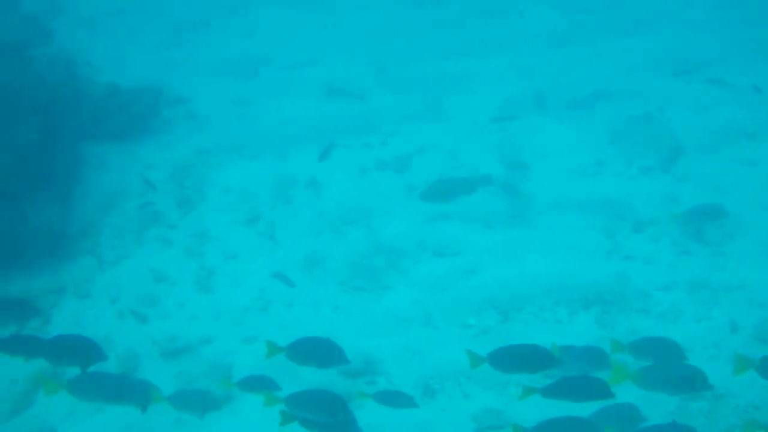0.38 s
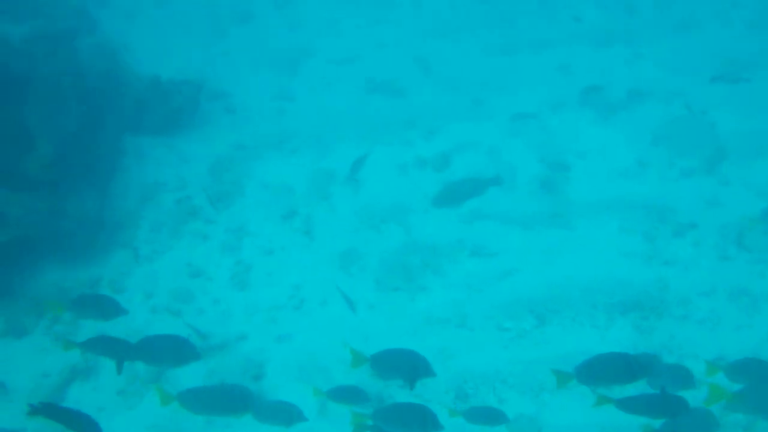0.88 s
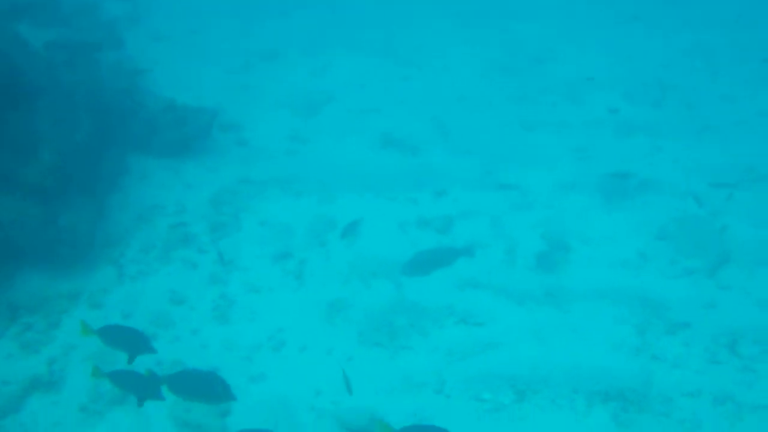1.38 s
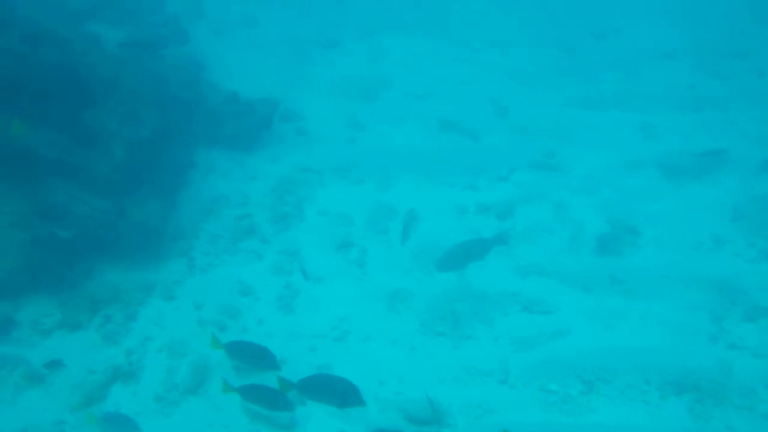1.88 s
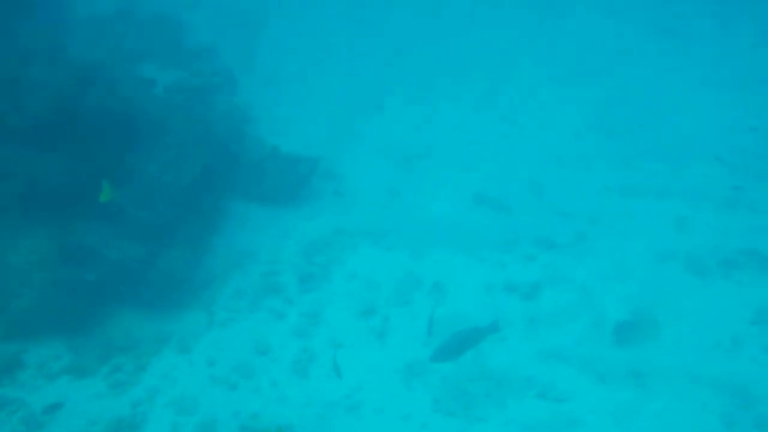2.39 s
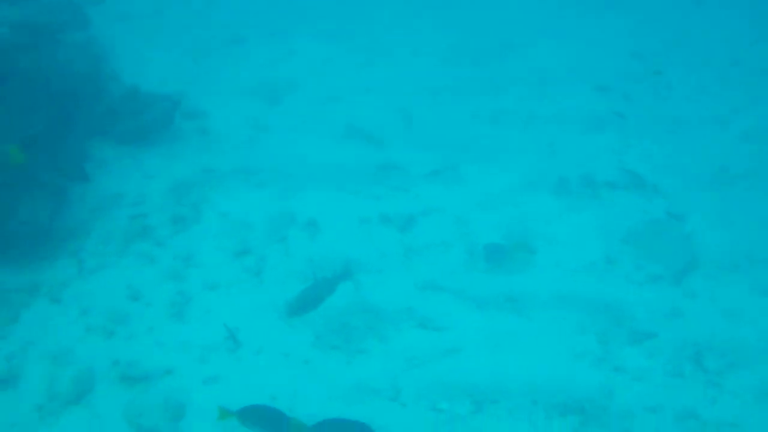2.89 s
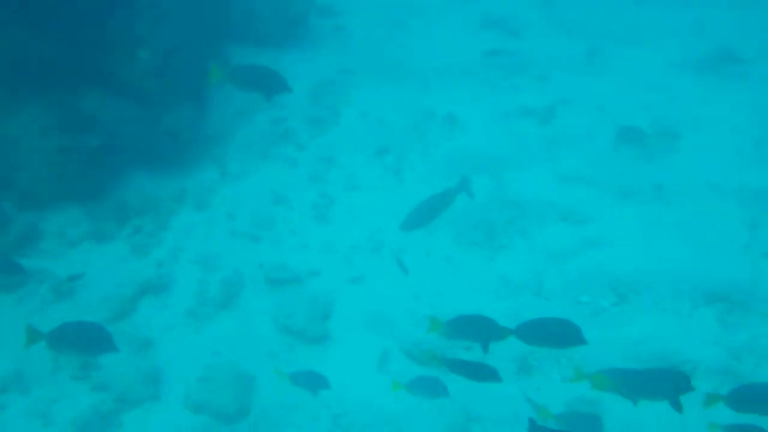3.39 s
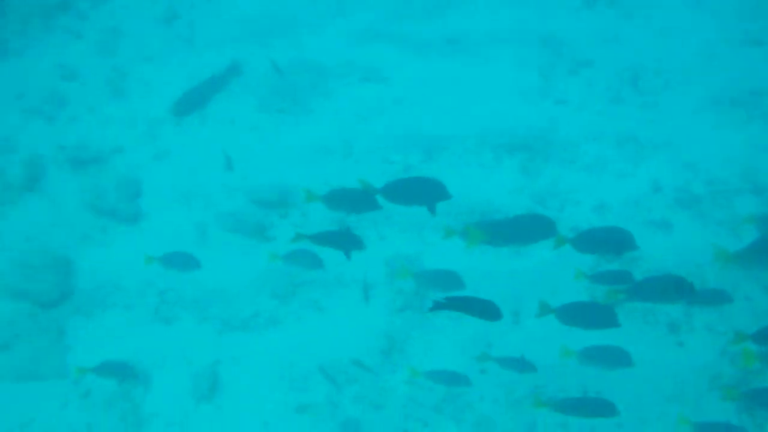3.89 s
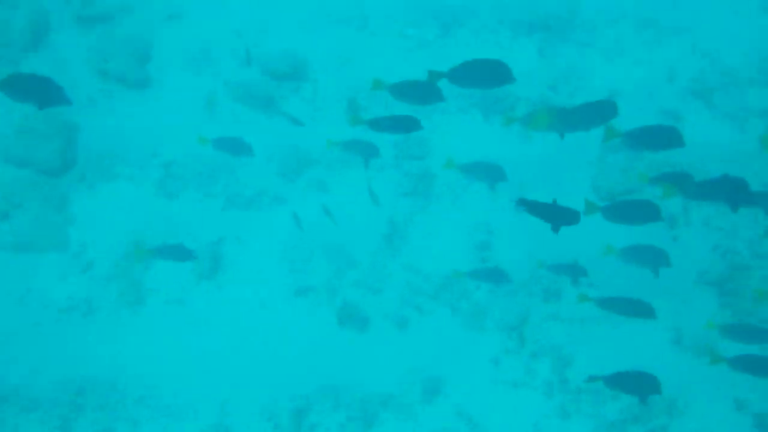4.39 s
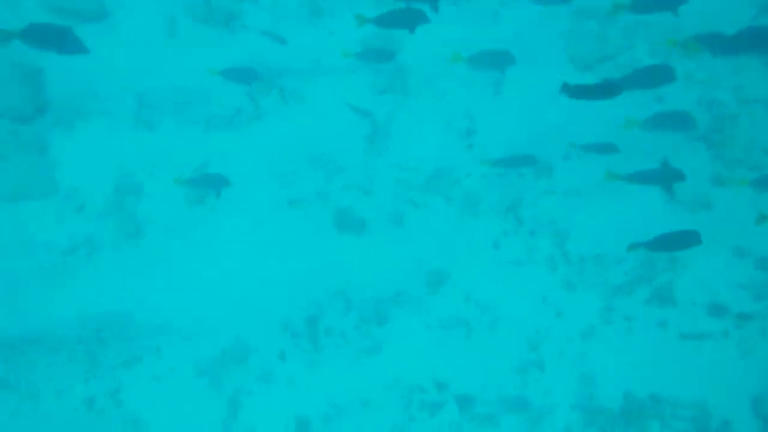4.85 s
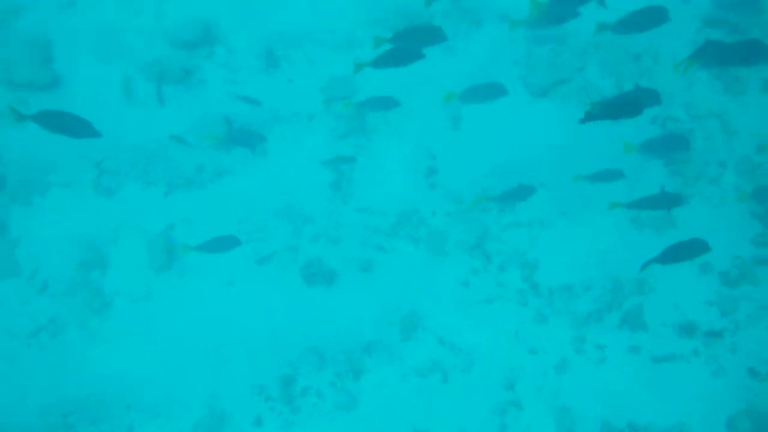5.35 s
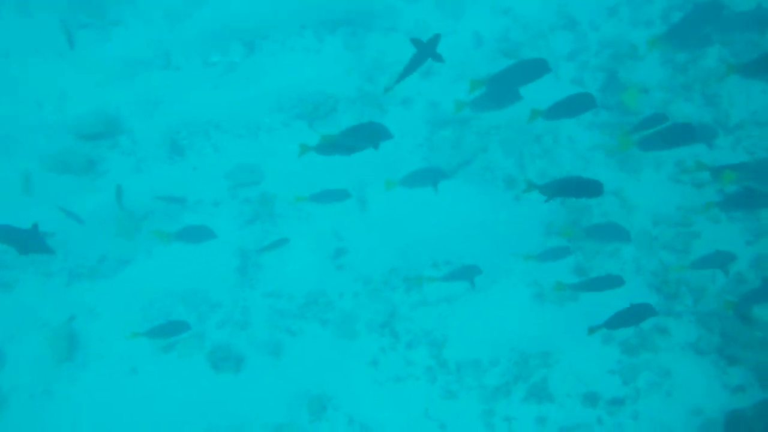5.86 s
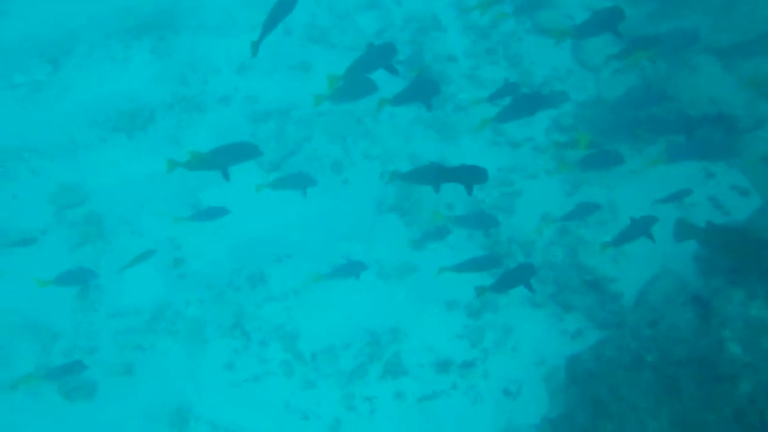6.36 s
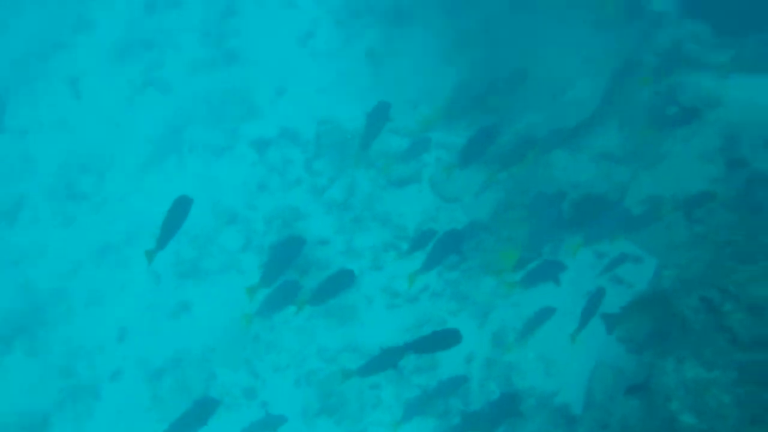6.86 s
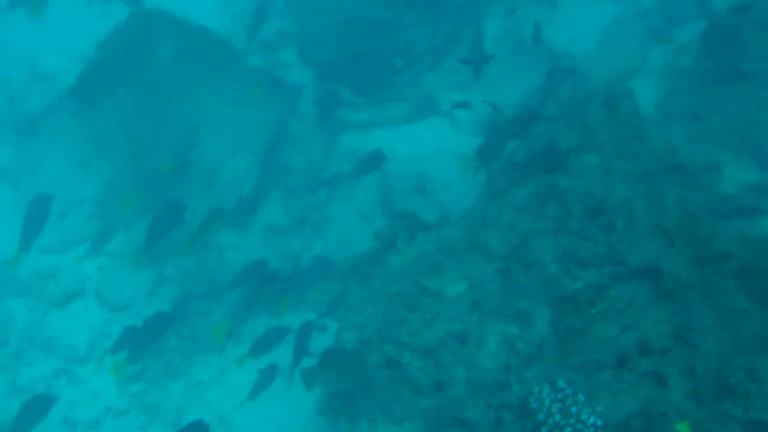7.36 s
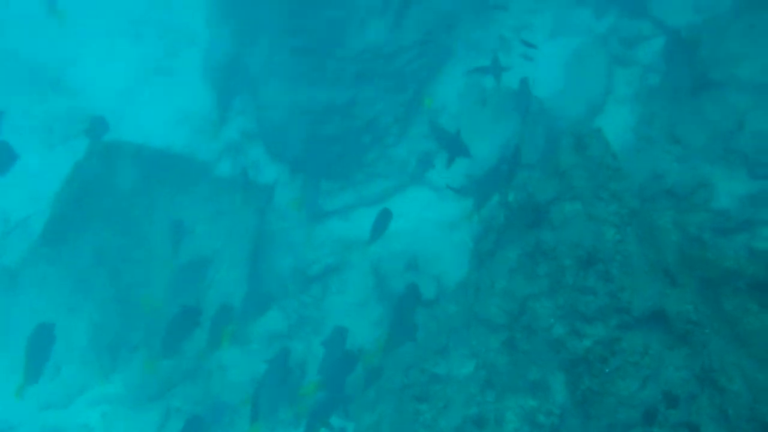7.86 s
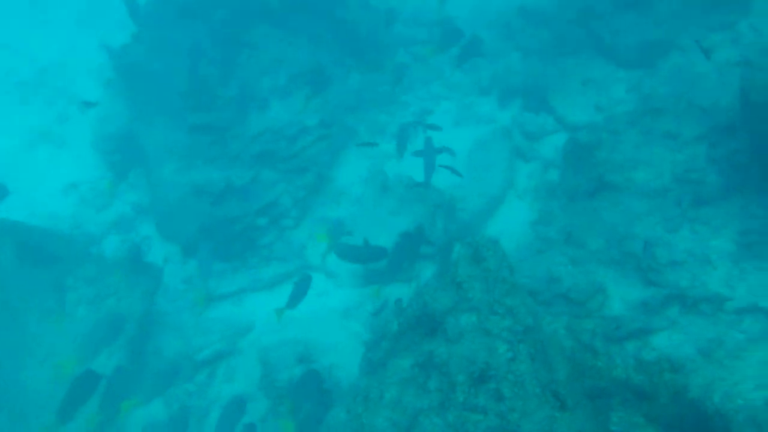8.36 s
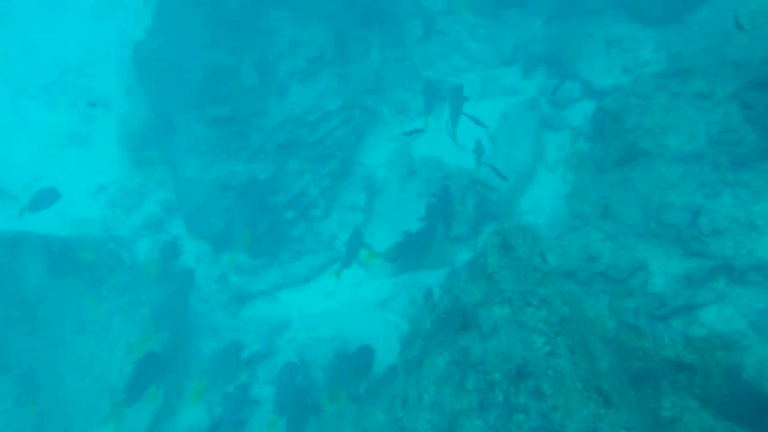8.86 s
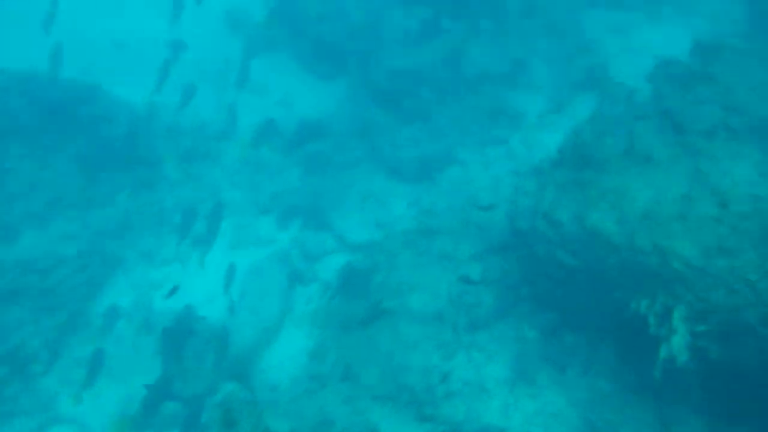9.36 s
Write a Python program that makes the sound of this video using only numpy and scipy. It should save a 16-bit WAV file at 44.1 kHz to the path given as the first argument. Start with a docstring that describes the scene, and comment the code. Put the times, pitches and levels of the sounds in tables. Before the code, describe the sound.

Muffled, close underwater sound from a camera sealed in a case. From 0 s a low rumble and hollow air-pocket boom waver beneath a fine, distant shrimp crackle, with many dry snaps, bubble blips and small water slaps. A dull thump lands near 1.6 s; bubbles cluster around 2.2 s, and a hard knock at 2.4 s makes the whole sound dip and slowly recover. More booming and knocks come at 3 to 4 s, with a strong one at 4.0 s. Thumps return near 5.1 and 5.4 s, and a sharp snap at 5.6 s. From 6.2 to 7 s the case heaves heavily, with deep surges, gurgling bubbles and the biggest thump at 7.0 s. Around 8 s the reef is sparse and quieter. Snaps pick up from 8.7 s, a cluster of clicks and a thump hit near 9.4 s, and rushing water and crackle swell to the end.

```python
"""A camera in a sealed housing drifts over a reef. From the start, shaped noise makes the rumble of water
pushing past the case, the boom of its air pocket and the wash of far shrimp. Short dying tones make bubbles,
then snaps, slaps of water, high ticks and, from 1.6 s, dull thumps. Between 6 and 7 s the case heaves and
thumps hardest; near 8 s the reef grows quiet, and water and crackle swell again toward the end.
Loud knocks make the camera's gain control duck; it creeps back after each."""
import sys
import numpy as np
from scipy import signal
from scipy.io import wavfile
from scipy.ndimage import uniform_filter1d

SR = 44100
rng = np.random.default_rng(int(sys.argv[2]) if len(sys.argv) > 2 else 0)


def boost_factor(decibels):
    """Convert a level in decibels to a linear amplitude factor."""
    exponent = np.asarray(decibels, float) / 20
    return 10 ** exponent


def log_audio(samples):
    """Write samples as a 16-bit WAV file to the path given in sys.argv[1]."""
    # one column per channel
    frames = np.atleast_2d(samples).T
    # limit to full scale, then quantise
    limited = np.clip(frames, -1, 1)
    pcm = np.round(limited * 32767).astype(np.int16)
    wavfile.write(sys.argv[1], SR, pcm)


N = 429534  # length in samples
# All levels in the tables are those before the gain control.


def evened(x):
    """Scales a sound to rms 1."""
    return x / np.sqrt(np.mean(x ** 2) + 1e-20)


def curve(table, axis=1):
    """Reads one column of a table of times at every sample."""
    table = np.array(table)
    return np.interp(np.arange(N) / SR, table[:, 0], table[:, axis])


def read(points, hz):
    """Reads a spectrum on a log-frequency axis."""
    f, value = np.transpose(points)
    return np.interp(np.log(hz + 1), np.log(f + 1), value)


def causal(points, size=2048):
    """Shortest impulse response with the given spectrum (minimum phase)."""
    gain = boost_factor(read(points, abs(np.fft.fftfreq(2 * size, 1 / SR))))
    spectrum = np.exp(np.conj(signal.hilbert(np.log(gain))))
    return np.fft.ifft(spectrum).real[:size]


def add(mix, s, sound):
    """Mixes a sound in at s seconds."""
    part = mix[round(s * SR):][:len(sound)]
    part += sound[:len(part)]


def resonate(x, hz, width):
    """Rings at the moving pitch hz: shifts it down to zero, smooths, and shifts back."""
    turn = np.exp(2j * np.pi * np.cumsum(hz) / SR)
    r = np.exp(-np.pi * width / SR)
    return 2 * (turn * signal.lfilter([1 - r], [1, -r], x / turn)).real


def lumpy(lump_db, lump_s):
    """White noise whose level wanders in lumps, as turbulent water does."""
    # The level is drawn once per 64 samples and smoothed by a bell curve.
    bell = np.exp(-(np.arange(-60, 61) * 64 / SR / lump_s) ** 2)
    lumps = evened(np.convolve(rng.standard_normal(N // 64 + 1), bell, "same"))
    level_db = lump_db * np.interp(np.arange(N) / 64, np.arange(len(lumps)), lumps)
    return evened(rng.standard_normal(N) * boost_factor(level_db))


def ring(hz, t60, rise_s, glide, size=3500):
    """A dying tone of peak 1 whose pitch slides by the share glide in every half t60 (s to fall 60 dB)."""
    t = np.arange(size) / SR
    swing = np.sin(2 * np.pi * hz * t * (1 + glide * t / t60))
    tone = swing * (1 - np.exp(-t / rise_s)) * boost_factor(-60 * t / t60)
    return tone / abs(tone).max()


def scattered(sound, echo_db, echo_s):
    """Adds the quick blur of echoes from rock, sand and surface."""
    echoes = boost_factor(echo_db) * rng.standard_normal(900) * np.exp(-np.arange(900) / SR / echo_s)
    return signal.convolve(sound, np.append(1, echoes))


def grains(templates, per_s, spread_db, clump_db):
    """Scatters the templates at random moments, in clumps; most are small, a few large."""
    # Each stretch of 900 samples has its own crowding.
    crowding = np.repeat(rng.standard_normal(N // 900 + 1), 900)[:N]
    clumps = boost_factor(clump_db * evened(crowding))
    size = boost_factor(spread_db * np.minimum(rng.exponential(1, N), 3.5))
    size = size * (rng.random(N) < clumps * per_s / SR)
    kind = rng.integers(0, len(templates), N)
    return evened(sum(signal.oaconvolve(size * (kind == k), g)[:N] for k, g in enumerate(templates)))


def hiss():
    """Self-noise of the microphone: steady white noise."""
    return boost_factor(-54.0) * rng.standard_normal(N)


# water pushing past the case: start_s, rumble_db, pocket_boom_db
WATER_FLOW = [(0.0, -30, -22.5), (0.3, -29.5, -23.5), (0.65, -36, -30), (1.0, -33.5, -22), (1.4, -29, -29),
              (1.58, -23, -20.5), (1.9, -27.5, -30.5), (2.3, -27, -19), (2.75, -27, -25),
              (2.92, -24.5, -9.5), (3.15, -26, -18.5), (3.55, -22, -9.5), (3.9, -28, -20.5),
              (4.2, -19.5, -17), (4.6, -17.5, -17.5), (5.0, -26.5, -24), (5.27, -30.5, -29.5),
              (5.42, -19, -15.5), (5.75, -22, -14), (6.05, -19.5, -12.5), (6.16, -11.5, -11),
              (6.33, -3.5, -5.5), (6.44, -5, -8), (6.5, -15, -10), (6.8, -12.5, -11), (7.0, -7, -9),
              (7.2, -17, -9), (7.75, -25, -26), (7.95, -21, -16.5), (8.5, -24, -16), (9.03, -16.5, -10.5),
              (9.17, -24.5, -23), (9.5, -9, -9.5), (9.74, -9, -6)]
# level of the deep heave: start_s, level_db
HEAVE_LEVEL = [(0.0, -40.5), (1.2, -47.5), (1.8, -56), (3.1, -36), (3.9, -33.5), (4.17, -18.5), (4.6, -31),
               (5.2, -38), (5.95, -41), (6.15, -22), (6.3, -3), (6.44, -9.5), (6.55, -27), (7.1, -27),
               (7.7, -42), (8.9, -36.5), (9.4, -22), (9.74, -28)]
# spectrum of the eddies on the case wall: pitch_hz, level_db (per Hz)
EDDY_SPECTRUM = [(60, -9.5), (110, -3.5), (200, 1.5), (320, 5), (450, -13.5), (560, -19.5), (1200, -50.5),
                 (4000, -74)]
# spectrum of the surges that heave the case: pitch_hz, level_db (per Hz)
HEAVE_SPECTRUM = [(10, -39), (30, -6), (55, -5.5), (85, 2), (150, -1), (320, -33), (2000, -80)]


def rumble():
    """Eddies thud on the case wall, and larger surges heave the whole case."""
    eddies = evened(signal.oaconvolve(lumpy(1.5, 0.06), causal(EDDY_SPECTRUM, size=4096))[:N])
    surges = evened(signal.oaconvolve(lumpy(3.7, 0.012), causal(HEAVE_SPECTRUM, size=8192))[:N])
    return boost_factor(curve(WATER_FLOW)) * eddies + boost_factor(curve(HEAVE_LEVEL)) * surges


# pitch of the air pocket as the camera tilts, and how far sloshing makes it waver:
# start_s, pitch_hz, waver_hz (rms)
POCKET_PITCH = [(0., 384, 11), (3.9, 380.6, 18.5), (5.15, 365, 41), (5.7, 313.5, 37), (6.3, 325, 69),
                (7.75, 288, 41), (8.1, 326.3, 37), (9.74, 332, 38)]


def pocket(top_hz=450.0):
    """Turbulence rings the trapped air; above its pitch the stiff wall passes little."""
    slosh = uniform_filter1d(rng.standard_normal(N), size=220)
    slosh = evened(uniform_filter1d(slosh, size=220))
    hz = curve(POCKET_PITCH) + curve(POCKET_PITCH, axis=2) * slosh
    once = resonate(lumpy(1.2, 0.012), hz, 93.0)
    twice = resonate(once, hz, 59.0)
    boom = signal.lfilter(*signal.butter(5, top_hz, fs=SR), twice)
    return boost_factor(curve(WATER_FLOW, axis=2)) * evened(boom)


# busy and quiet spells: start_s, reef_crackle_db (before the case), small_bubbles_db
BUSY_SPELLS = [(0.0, -40.5, -35.5), (0.3, -40.5, -33.5), (0.7, -44, -36), (1.05, -39, -32),
               (1.35, -47.5, -35), (1.6, -39.5, -31), (1.92, -44.5, -31), (2.2, -39, -33.5),
               (2.8, -39.5, -30), (3.15, -37.5, -25.5), (3.7, -39.5, -33.5), (4.2, -38.5, -30.5),
               (4.95, -41, -34.5), (5.2, -46, -49.5), (5.6, -39, -31), (6.22, -40.5, -32.5),
               (6.53, -32, -29), (6.85, -37.5, -24), (7.15, -41.5, -32.5), (8.0, -50, -39.5),
               (8.55, -43.5, -36.5), (9.03, -36.5, -33.5), (9.25, -44.5, -34), (9.42, -32.5, -25),
               (9.55, -34.5, -23), (9.74, -34.5, -21)]
# finest sounds of the reef, before the case: start_s, fizz_db, wash_treble_db
FINE_REEF = [(0.0, -33.5, -35), (1.0, -33, -42), (2.0, -35.5, -40), (3.0, -28.5, -35), (4.0, -33, -35.5),
             (5.0, -33.5, -38), (5.8, -34.5, -39), (6.5, -30.5, -32.5), (7.2, -35.5, -38), (7.8, -37, -39),
             (8.3, -34.5, -45), (8.9, -33, -36), (9.3, -35.5, -31.5), (9.74, -28.5, -27)]
# how the case passes sound from the water to the microphone: pitch_hz, gain_db (relative)
CASE_PASSAGE = [(400, -32.5), (950, -7.5), (1250, -10), (1600, 1.5), (2200, 0), (2550, -3), (2850, 0),
                (3600, -10.5), (4250, -9.5), (4750, -10), (5400, -2.5), (6400, -15.5), (7500, -20.5),
                (8700, -16), (10600, -17), (11500, -21.5), (13000, -26), (14400, -33), (15500, -58)]


def reef(wash_db=-35.5, follow=0.52, far_hz=6700.0):
    """Countless far shrimp merge to a wash and a fine fizz; nearer ones crackle in spells."""
    draws = rng.random((2, 20, 2))
    fine = [ring(3000 + 12500 * a, (3.5 + 16.0 * b ** 2) / (3000 + 12500 * a), 0.00006, 0, size=300)
            for a, b in draws[0]]
    coarse = [ring(1200 + 3300 * a, (2.5 + 30.0 * b ** 3) / (1200 + 3300 * a), 0.0001, -0.22, size=1400)
              for a, b in draws[1]]
    spell_db = curve(BUSY_SPELLS)
    # The wash splits at far_hz; its lower part follows the spells by the share follow.
    wide = lumpy(1.5, 0.012)
    far = signal.lfilter(*signal.butter(3, far_hz, fs=SR), wide)
    treble = signal.lfilter(*signal.butter(3, far_hz, "high", fs=SR), wide)
    water = boost_factor(wash_db + follow * (spell_db - spell_db.mean())) * far
    water += boost_factor(curve(FINE_REEF, axis=2)) * treble
    fizz = grains([scattered(g, -23.0, 0.0032) for g in fine], 650.0, 5.76, 2.8)
    water += boost_factor(curve(FINE_REEF)) * fizz
    crackle = grains([scattered(g, -31.0, 0.009) for g in coarse], 420.0, 4.6, 3.5)
    water += boost_factor(spell_db) * crackle
    case = causal(CASE_PASSAGE)
    return signal.oaconvolve(water, case / np.linalg.norm(case))[:N]


# level of the larger, deeper bubbles: start_s, level_db
LARGE_BUBBLES = [(0.0, -44), (2.0, -46), (3.4, -36), (3.75, -24), (4.3, -31), (4.9, -38.5), (6.3, -53),
                 (6.8, -17), (7.1, -50), (9.74, -42)]
# clearest bubbles slipping around the case:
# start_s, peak_db (before echoes), start_pitch_hz, t60_s, slide (share of the pitch per half t60)
CLEAR_BUBBLES = [(0.405, -19, 1000, 0.036, 0.024), (0.571, -12.5, 1026, 0.035, -0.027),
                 (1.097, -16.5, 2210, 0.016, -0.048), (1.803, -31.5, 1050, 0.39, -0.066),
                 (2.162, -18, 1310, 0.033, -0.25), (2.208, -17, 1430, 0.079, 0.085),
                 (2.229, -14.5, 797, 0.084, -0.046), (2.227, -24, 1060, 0.059, .05),
                 (2.229, -21, 1806, 0.031, 0.045), (2.283, -28, 1560, 0.08, -.02),
                 (2.289, -15, 1033, 0.072, -0.094), (3.841, -17, 1600, 0.049, -0.058),
                 (4.665, -17, 836, 0.067, 0.095), (4.76, -18, 896, 0.066, 0.064),
                 (5.773, -19, 1530, 0.067, 0.031), (6.327, -18.5, 1275, 0.12, -0.27),
                 (6.435, -23, 805, 0.1, 0.55), (6.483, -20, 1300, 0.048, .1), (6.517, -11, 1430, 0.026, 0),
                 (6.557, -12, 1115, 0.12, -0.35), (6.59, -11, 1500, 0.04, 0.22),
                 (6.65, -20, 1560, 0.14, -0.081), (6.697, -12, 1340, 0.04, -0.027),
                 (6.72, -13, 2830, 0.034, -0.014), (6.75, -15, 1530, 0.087, -0.38),
                 (6.825, -12, 1700, 0.018, -0.0099), (6.857, -15, 1710, 0.03, 0.2),
                 (6.983, -18, 1320, 0.08, 0.048), (7.276, -15, 790, 0.022, -0.04),
                 (7.61, -25, 1150, 0.05, 0.072), (8.792, -19, 1950, 0.032, 0.14),
                 (8.903, -20.5, 1420, 0.09, -0.042), (8.93, -20, 1080, 0.05, -0.038),
                 (8.966, -22, 1220, 0.04, 0.19), (9.021, -17, 820, 0.067, -0.023)]
# tiny bubbles whose pitch drops fast: start_s, peak_db, start_pitch_hz
TINY_BUBBLES = [(2.004, -20, 4300), (2.01, -24, 3520), (2.018, -31, 2376), (2.038, -23, 4660),
                (2.101, -25, 4400), (2.124, -20.5, 2570), (6.401, -9, 3100), (6.554, -9, 4290),
                (6.614, -11, 2400), (6.69, -24, 3150), (8.468, -25, 1750), (8.514, -17, 1950),
                (8.829, -16, 2350), (8.929, -18, 1950), (8.863, -21, 2300)]


def bubbles():
    """Each bubble rings at its own pitch and slides as it deforms."""
    small = [ring(480 * 3.18 ** a, 0.0013 + 0.065 * b ** 2, 0.0033, 0.5 * (c - 0.5), size=4500)
             for a, b, c in rng.random((24, 3))]
    out = boost_factor(curve(BUSY_SPELLS, axis=2)) * grains(small, 600.0, 2.6, 3.0)
    large = [ring(520 * 1.47 ** a, 0.028 + 0.061 * b, 0.0012, 0.59 * (c - 0.5), size=4500)
             for a, b, c in rng.random((12, 3))]
    out += boost_factor(curve(LARGE_BUBBLES)) * grains(large, 160.0, 6.4, 4.4)
    for s, peak_db, hz, t60, slide in CLEAR_BUBBLES:
        bubble = ring(hz, t60, 0.0018, slide, size=6000)
        add(out, s, boost_factor(peak_db) * scattered(bubble, -23.5, 0.011))
    for s, peak_db, hz in TINY_BUBBLES:
        add(out, s, boost_factor(peak_db) * ring(hz, 0.023, 0.00053, -0.25, size=1600))
    return out


# loudest near snaps and ticks on the case:
# start_s, peak_db, ring_pitch_hz, ring_t60_s, crack_db (against the ring)
NEAR_SNAPS = [(0.0979, -4, 2070, 0.0032, 25), (0.2406, -9, 1981, 0.007, 35), (0.2704, 1, 2360, 0.0093, 2),
              (0.334, -14, 2310, 0.006, 6), (0.402, -4.5, 1560, 0.0068, -4), (0.559, -13, 2970, 0.0087, -8),
              (0.5684, -1.5, 1620, 0.037, -26), (0.6027, -10, 2560, 0.0044, -3),
              (0.771, -7.5, 1810, 0.0067, 9.5), (0.829, -6, 1990, 0.0026, -17),
              (0.907, -10, 2920, 0.019, 22), (0.943, -6.5, 2440, 0.014, -7), (1.016, -8, 1440, 0.012, -0.5),
              (1.0425, -7, 1512, 0.039, -26), (1.0588, -9, 1750, 0.015, 0), (1.1274, -1, 2310, 0.0053, 0.5),
              (1.1687, -9, 1470, 0.0034, -10), (1.5088, -8, 2350, 0.026, -18), (1.565, -9, 690, 0.046, -22),
              (1.6593, -4, 2390, 0.0047, -1), (1.915, -14, 1443, 0.029, -6),
              (2.0462, -10, 2230, 0.019, -21), (2.067, -8.5, 2983, 0.023, 18),
              (2.1202, -12.5, 1580, 0.012, -13), (2.1575, -10.5, 820, 0.13, -21),
              (2.1883, -1, 1610, 0.0058, -19.5), (2.25, -12.5, 2200, 0.01, -2),
              (2.274, -8, 2940, 0.0062, -3), (2.3037, -7, 3270, 0.011, 6), (2.3641, 20, 1390, 0.0038, 1),
              (2.4572, -4.5, 1960, 0.0065, 1), (2.493, 3, 1620, 0.0056, 1), (2.518, -4, 2470, 0.014, 8),
              (2.653, 5, 1320, 0.0055, -12), (2.674, -1.5, 1940, 0.013, -2), (2.7658, -2, 2200, 0.0044, 3),
              (2.7915, -5, 1500, 0.02, 8), (2.9743, -3, 2200, 0.0042, 28), (3.0233, 0, 1650, 0.016, 5),
              (3.0238, 1.5, 720, 0.025, -17), (3.1412, 8, 1480, 0.012, 4), (3.149, 0.5, 874, 0.018, -11),
              (3.207, -1, 1690, 0.0043, -6), (3.239, -2, 750, 0.018, -19), (3.357, -7, 1590, 0.016, -7),
              (3.406, -8, 2860, 0.018, -7), (3.45, -12, 1800, 0.008, 7), (3.5038, -13, 2370, 0.007, 8),
              (3.5297, -6.5, 2250, 0.01, 16), (3.632, -5, 2260, 0.0048, -20), (3.762, -7.5, 1590, 0.014, 7),
              (3.813, -9, 2330, 0.011, 0), (3.947, -8, 1740, 0.042, 2), (3.951, -1.5, 990, 0.0056, -8),
              (4.0177, 16.5, 930, 0.0016, -13), (4.14, -3.5, 1830, 0.01, 8), (4.198, -13, 2537, 0.0062, 9),
              (4.2696, -8, 2190, 0.0071, 2), (4.368, -8, 2280, 0.01, -29), (4.5087, -5, 1700, 0.0054, -4),
              (4.6008, -7.5, 1856, 0.0061, -9), (4.6918, -4.5, 2330, 0.0064, 13),
              (4.887, -10.5, 2900, 0.026, 11), (5.0786, -13, 800, 0.012, -18),
              (5.196, -9.5, 1450, 0.023, 6.5), (5.2388, -10, 2200, 0.0089, 1),
              (5.258, -11, 2230, 0.0075, 10), (5.2777, -8.5, 2280, 0.012, 19), (5.39, -6, 894, 0.03, -24),
              (5.5641, 10.5, 2550, 0.0065, 6.5), (5.573, -0.5, 2220, 0.094, 13),
              (5.5875, -4, 2380, 0.0081, 13), (5.7384, -8.5, 3120, 0.016, 2), (5.7465, -3, 2450, 0.0047, 3),
              (5.8613, -8, 3100, 0.016, -15), (6.0137, -6, 1820, 0.017, 11),
              (6.1422, -6.5, 2870, 0.013, 30), (6.2574, -1.5, 2480, 0.0057, -15.5),
              (6.472, -2.5, 2270, 0.027, 1), (6.531, 4, 2520, 0.039, 2), (6.5473, 3, 1420, 0.082, -1),
              (6.556, 3, 1470, 0.017, 4), (6.5673, 15.5, 1830, 0.03, -16), (6.7215, 0.5, 2280, 0.022, -5),
              (6.733, 3.5, 800, 0.088, -22), (6.844, -3.5, 1000, 0.053, -20), (6.8537, -2, 620, 0.055, -21),
              (6.9534, -0.5, 2470, 0.0088, 29), (7.0269, -3, 790, 0.011, -2), (7.165, -7, 2620, 0.006, 9),
              (7.275, -4.5, 1550, 0.07, -2), (7.3, -5, 1610, 0.02, -12), (7.459, -20, 2590, 0.006, 8),
              (7.488, -5, 1730, 0.018, -8), (7.7506, -7, 2320, 0.037, 20), (7.834, -12.5, 1460, 0.02, -13),
              (7.853, -13, 3080, 0.01, 6), (7.96, -13.5, 2500, 0.008, 7.5), (8.0706, -16, 2300, 0.008, 4),
              (8.211, -14.5, 3020, 0.01, 28), (8.4221, -19, 2470, 0.008, -4),
              (8.509, -14, 1900, 0.011, -12), (8.564, -13.5, 2400, 0.01, -11),
              (8.6585, -7.5, 2140, 0.062, 10.5), (8.676, -12, 2100, 0.039, 4),
              (8.7036, 8, 1790, 0.031, -13), (8.8236, -6.5, 2800, 0.022, 7), (8.902, -1, 2354, 0.0092, -20),
              (8.9928, -8, 3270, 0.007, 4), (9.0532, -12, 2800, 0.018, -3), (9.073, -5.5, 4220, 0.0079, -3),
              (8.687, -8, 5130, 0.007, 10), (8.713, 0, 4500, 0.006, 7), (9.263, -13, 1860, 0.0076, -2),
              (9.301, -13.5, 1700, 0.044, -11), (9.3376, -6.5, 2293, 0.01, 19), (9.375, 6, 1770, 0.011, 2),
              (9.38, 4.5, 1580, 0.015, 6), (9.414, 9, 1970, 0.011, 1)]
# what the case rings with at every snap: pitch_hz, level_db (against the ring), t60_s
SHELL_RINGS = [(664, -21, 0.049), (812, -16.5, 0.03), (1080, -16.5, 0.031), (1620, -38, 0.05),
               (2560, -28, 0.012)]


def snaps(rise_s=0.00026, tail_db=-14.0, tail_s=0.0037, tail_hz=3050.0, crack_hz=6450.0, duller_per_db=0.08):
    """A crack through the case, duller the louder it is, a sagging tone, shell ring and a dull tail."""
    out, t, case = np.zeros(N), np.arange(3500) / SR, causal(CASE_PASSAGE)
    noise = rng.standard_normal((len(NEAR_SNAPS), len(t)))
    tails = signal.lfilter(*signal.butter(4, tail_hz, fs=SR), noise)
    tails = tails * (np.exp(-t / tail_s) + boost_factor(-12.0) * np.exp(-t / 0.015))
    tails = signal.oaconvolve(tails, case[None], axes=1)[:, :len(t)]
    shell = sum(boost_factor(db) * ring(hz, t60, rise_s, 0) for hz, db, t60 in SHELL_RINGS)
    for (s, peak_db, hz, t60, crack_db), tail in zip(NEAR_SNAPS, tails):
        snap = ring(hz, t60, rise_s, -0.058) + shell
        snap += boost_factor(tail_db) * tail / tail[:300].std()
        top_hz = min(crack_hz * np.exp(-duller_per_db * peak_db), 20000)
        front = signal.lfilter(*signal.butter(1, top_hz, fs=SR), case[:1000])
        crack = scattered(front, -18.5, 0.0033)
        snap[:len(crack)] += boost_factor(crack_db) * crack / abs(crack).max()
        add(out, s, boost_factor(peak_db) * snap / abs(snap).max())
    return out


def swing(out, middle_s, level_db, hz, length_s):
    """Mixes in a tone that swells and fades; length_s is its width at half height."""
    t = np.arange(-2200, 2200) / SR
    bell = 0.5 ** ((2 * t / length_s) ** 2)
    add(out, middle_s + t[0], -boost_factor(level_db) * np.sin(2 * np.pi * hz * t) * bell)


# slaps of water: middle_s, level_db, length_s
WATER_SLAPS = [(0.164, -12, 0.033), (0.312, -7, 0.011), (0.872, -3, 0.012), (1.18, -11, 0.026),
               (1.34, -10.5, 0.0098), (1.511, -10.5, 0.012), (1.577, 3.5, 0.025), (1.921, -8, 0.013),
               (2.085, -13, 0.027), (2.135, -12, 0.019), (2.263, -11.5, 0.0091), (2.324, -6, 0.017),
               (2.417, -1, 0.011), (2.606, -3, 0.0071), (3.243, 12.5, 0.012), (3.588, 2.5, 0.031),
               (3.978, -6.5, 0.017), (4.022, 3, 0.005), (4.148, -3, 0.028), (4.223, -3, 0.01),
               (5.093, -1, 0.017), (5.203, -10.5, 0.012), (6.163, 0, 0.011), (6.495, -5, 0.013),
               (8.575, -4.5, 0.032), (8.941, 5.5, 0.005), (8.992, 2, 0.0039), (9.102, -2.5, 0.031),
               (9.2, -1.5, 0.0062)]


def glugs():
    """Slaps of water set the air pocket swinging, slightly above its resting pitch."""
    out = np.zeros(N)
    times, pitches = np.transpose(POCKET_PITCH)[:2]
    for s, level_db, length_s in WATER_SLAPS:
        swing(out, s, level_db, 1.013 * np.interp(s, times, pitches), length_s)
    return out


# thin high ticks of small shrimp: start_s, peak_db (before echoes), pitch_hz
SHRIMP_TICKS = [(0.657, -12, 5500), (0.734, -17.5, 5300), (0.9872, -21, 5870), (1.4304, -23.5, 5210),
                (3.7309, -16, 5240), (5.4765, -21, 5530), (5.623, -8.5, 9500), (5.7758, -27, 5340),
                (6.982, -6.5, 7920), (8.224, -12, 5350), (8.254, -22, 5640), (8.3285, -16, 5650),
                (9.0139, -9, 5000), (9.3474, -9, 4540), (9.401, 0, 4520)]


def ticks():
    """A few quick swings, falling 60 dB in 5.5 cycles, with the blur of their echoes."""
    out = np.zeros(N)
    for s, peak_db, hz in SHRIMP_TICKS:
        tick = ring(hz, 5.5 / hz, 0.00006, 0, size=300)
        add(out, s, boost_factor(peak_db) * scattered(tick, -25.0, 0.0027))
    return out


# dull thumps on the whole case: middle_s, level_db, pitch_hz
CASE_THUMPS = [(1.5665, 0.5, 197), (5.08, 3.5, 269), (5.393, 0.5, 450), (5.848, 0, 210), (6.226, 7, 310),
               (6.248, 3, 292), (6.308, 9, 139), (6.37, 8, 307), (6.433, 1, 192), (6.732, 12, 297),
               (6.855, 7.5, 253), (7.0274, 22.5, 233), (9.421, 6.5, 271)]


def thumps():
    """A thump on the whole case dies after about one swing."""
    out = np.zeros(N)
    for s, level_db, hz in CASE_THUMPS:
        swing(out, s, level_db, hz, 1.11 / hz)
    return out


def scene():
    """Everything that reaches the microphone, over its own hiss."""
    background = hiss() + rumble() + pocket() + reef()
    return (background + bubbles() + snaps() + glugs() + ticks() + thumps())[None]


def top_cut(x):
    """Nothing passes above the cut-off."""
    return signal.sosfilt(signal.butter(12, 16670, fs=SR, output="sos"), x)


# dead spots of the microphone in its case: pitch_hz, width_hz
DEAD_SPOTS = [(3630, 110), (7420, 70), (14830, 100)]


def record(dry, limit_db=-6.5, recover_db_per_s=16.5, start_db=9.0, attack_s=0.0015):
    """Band limit and dead spots, then gain that falls in milliseconds and creeps back; overshoot clips."""
    low_pass = signal.firwin(701, 15800, window=("kaiser", 8), fs=SR)
    x = signal.oaconvolve(dry, low_pass[None], "same")
    for hz, width in DEAD_SPOTS:
        x = signal.lfilter(*signal.iirnotch(hz, hz / width, SR), x)
    # Hold the largest overshoot while it shrinks steadily; the gain starts out ducked by start_db.
    climb = np.arange(N) * recover_db_per_s / SR
    over_db = 20 * np.log10(abs(x[0]) + 1e-9) - limit_db
    highest_db = np.maximum.accumulate(np.maximum(over_db + climb, start_db))
    held_db = np.maximum(highest_db - climb, 0)
    r = np.exp(-1 / (attack_s * SR))
    duck_db = signal.lfilter([1 - r], [1, -r], held_db - start_db) + start_db
    mix = np.clip(x / boost_factor(duck_db), -0.71, 0.71)
    return top_cut(mix)


dry = scene()
out = record(dry)
log_audio(out)
```